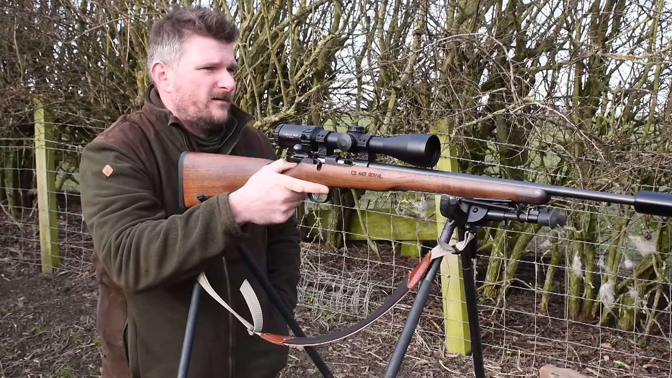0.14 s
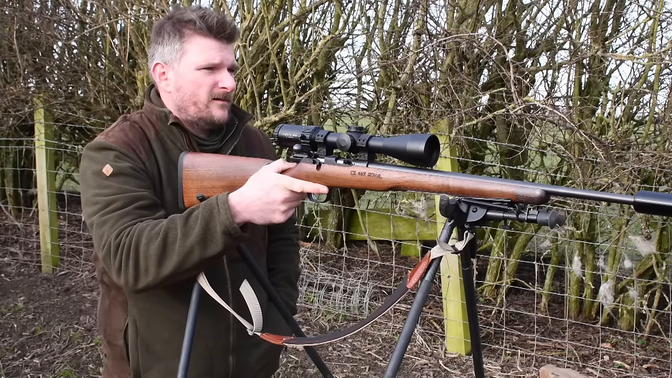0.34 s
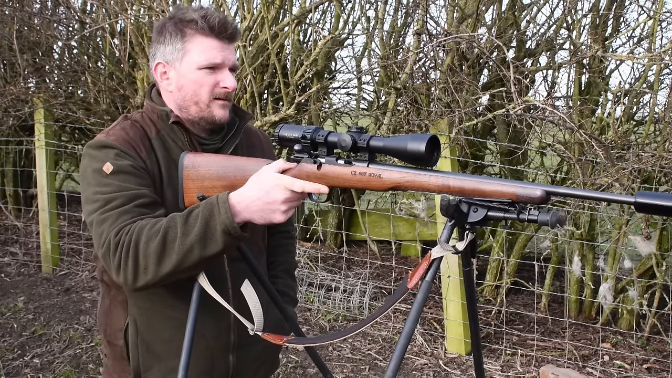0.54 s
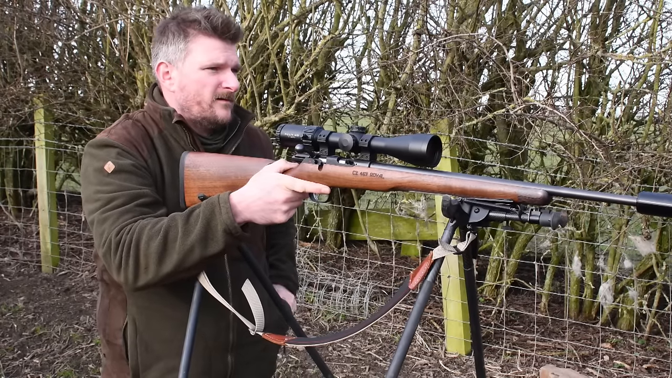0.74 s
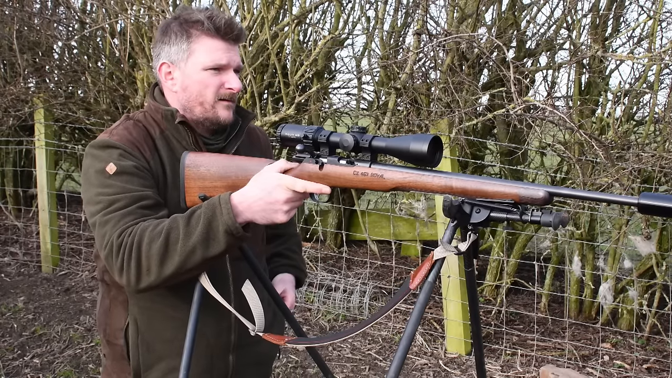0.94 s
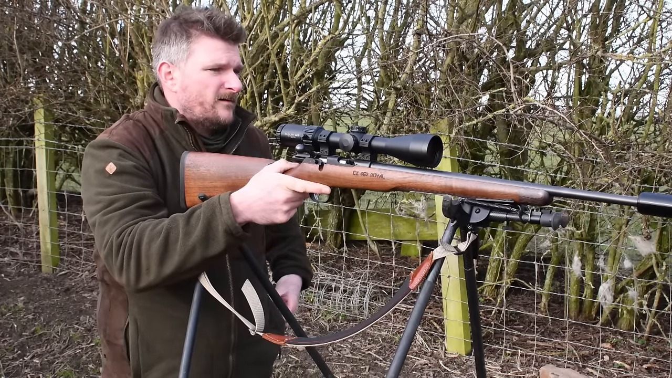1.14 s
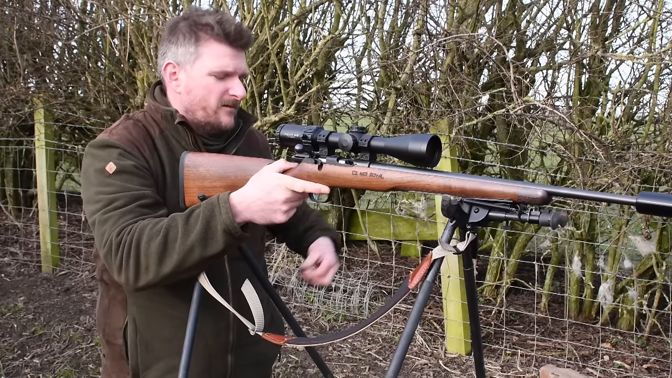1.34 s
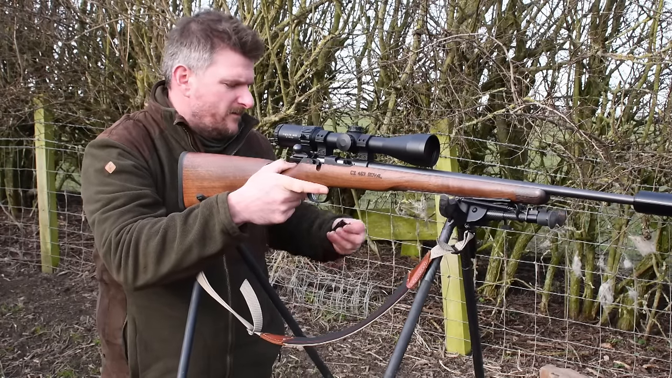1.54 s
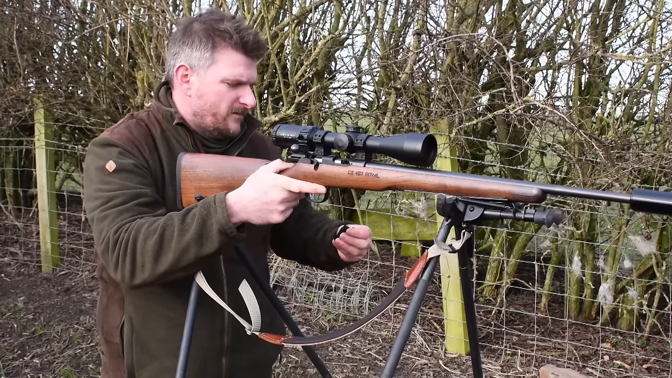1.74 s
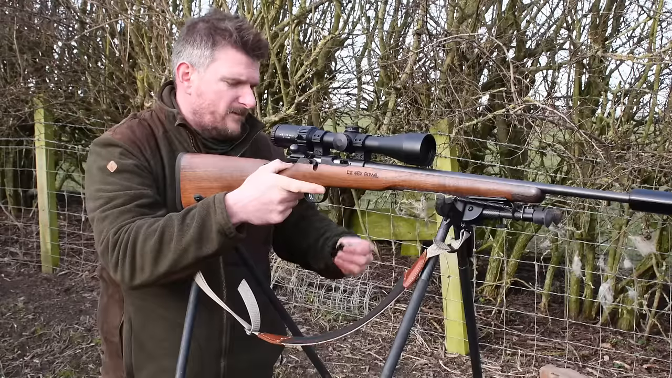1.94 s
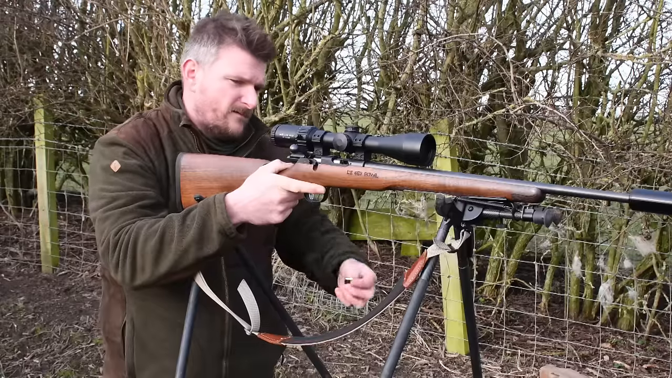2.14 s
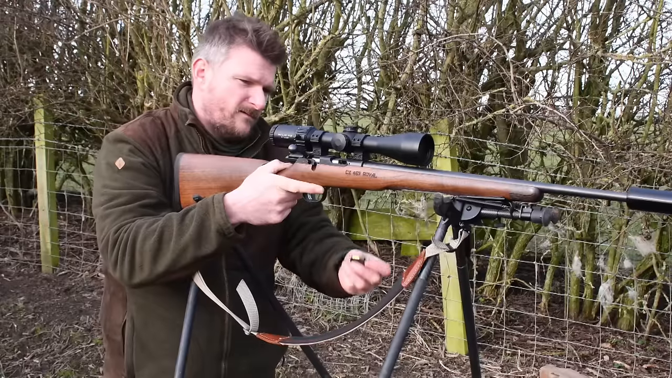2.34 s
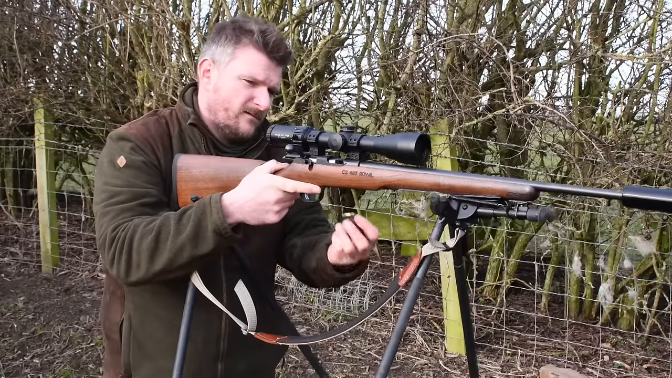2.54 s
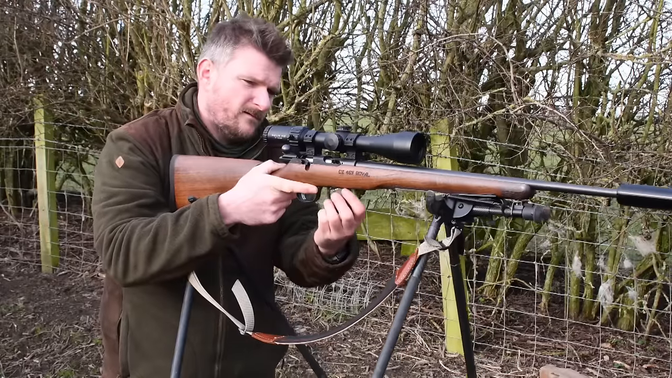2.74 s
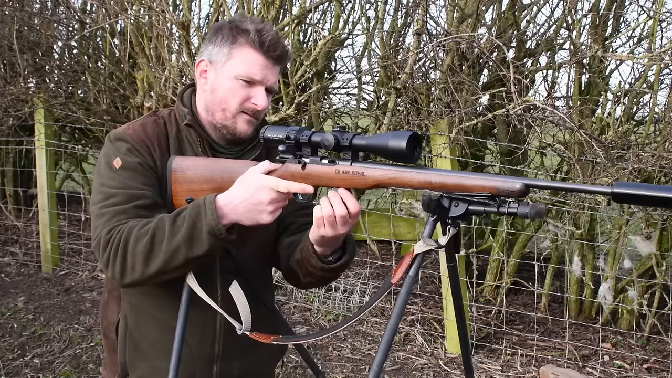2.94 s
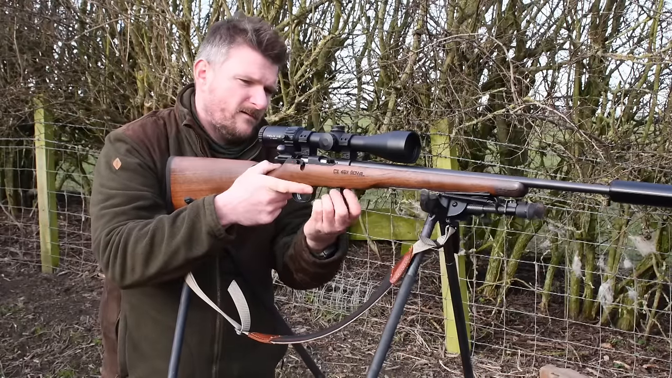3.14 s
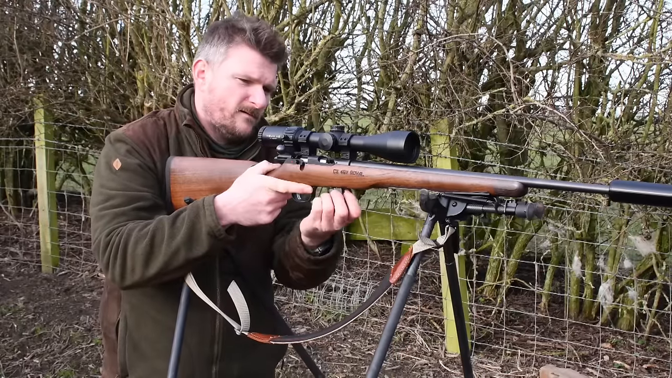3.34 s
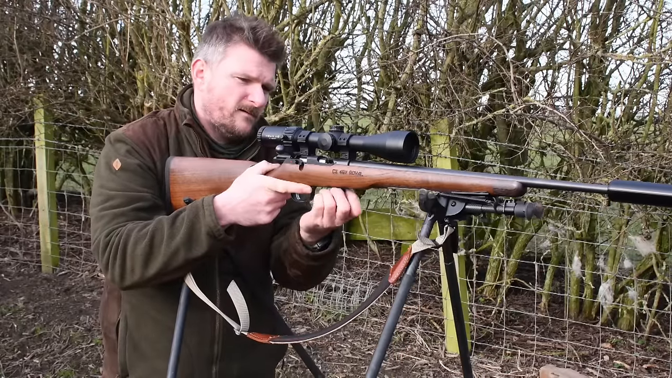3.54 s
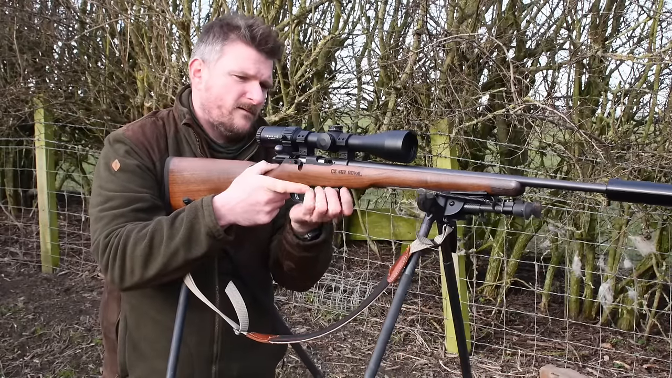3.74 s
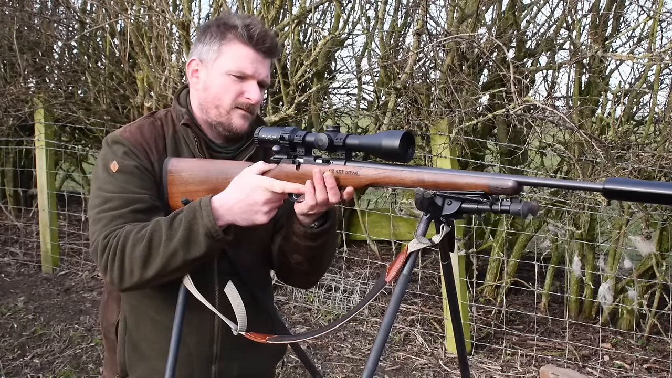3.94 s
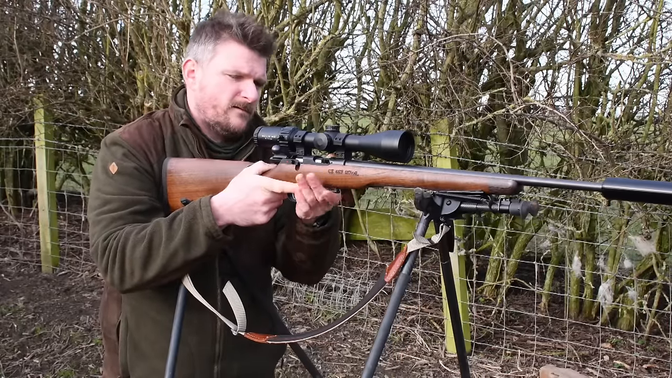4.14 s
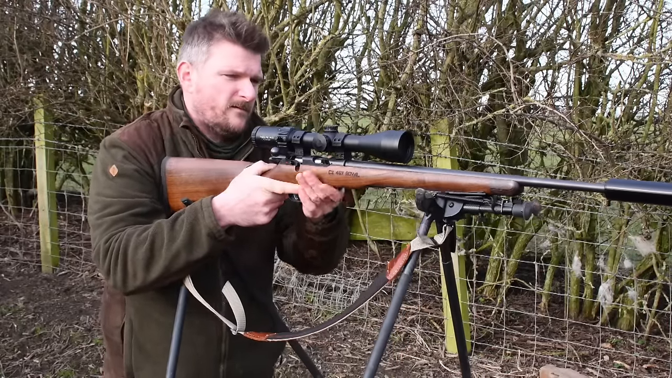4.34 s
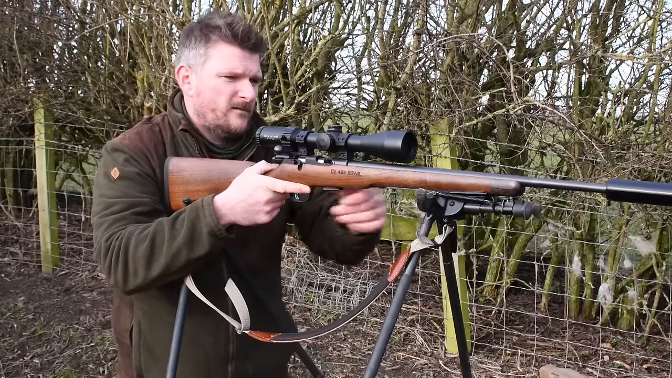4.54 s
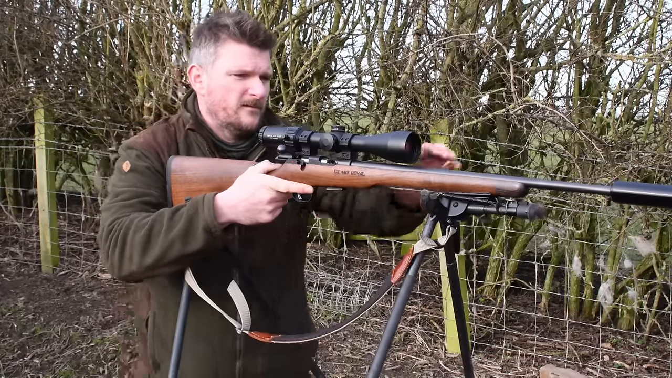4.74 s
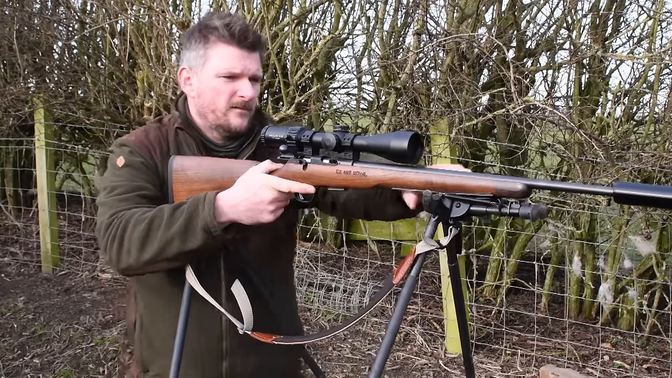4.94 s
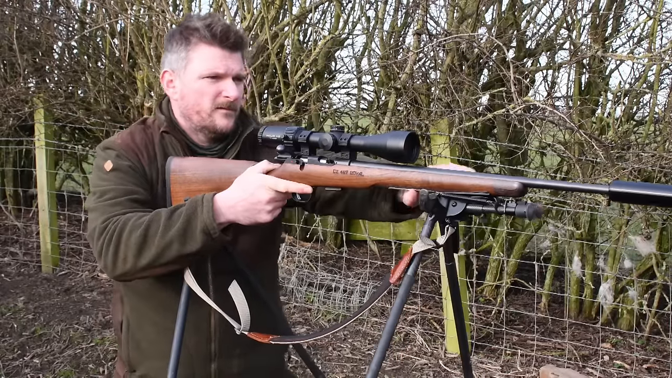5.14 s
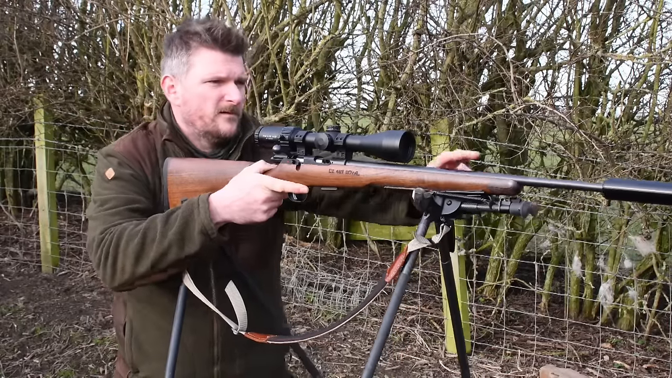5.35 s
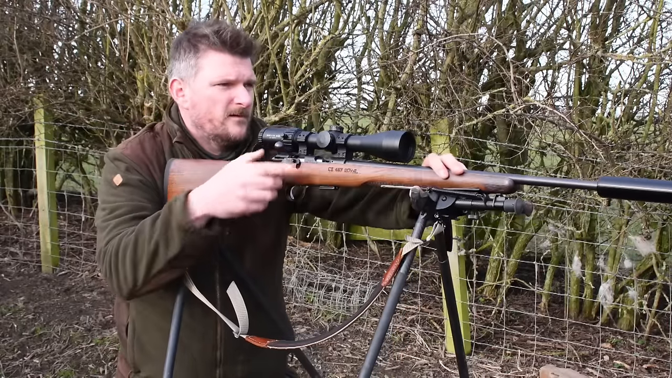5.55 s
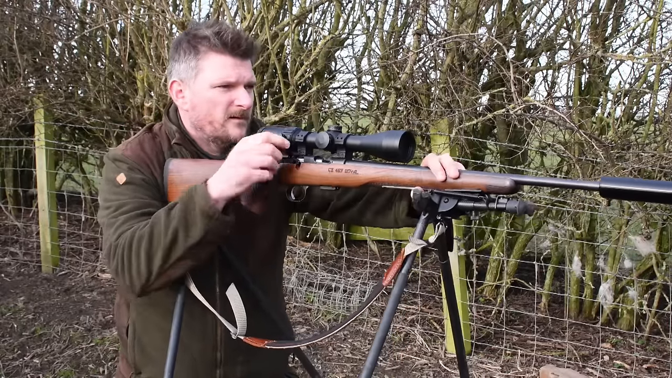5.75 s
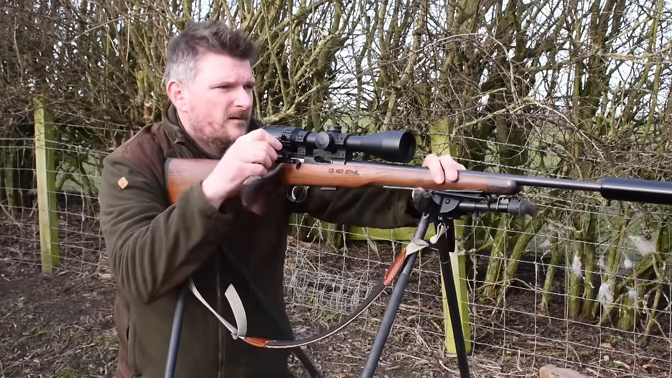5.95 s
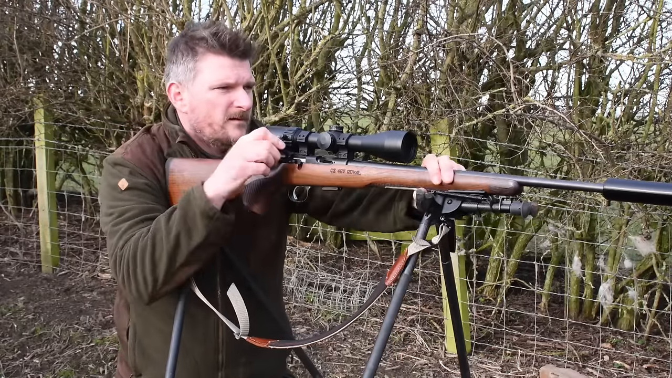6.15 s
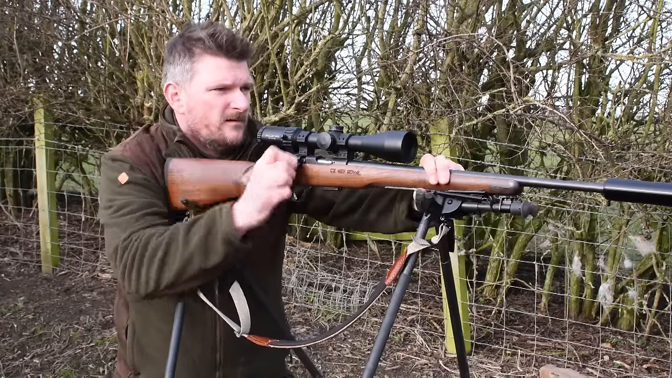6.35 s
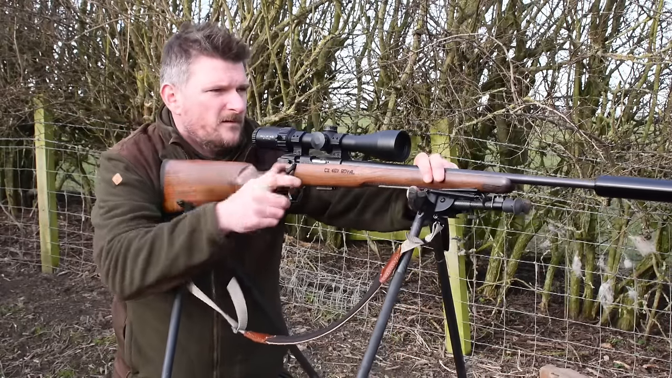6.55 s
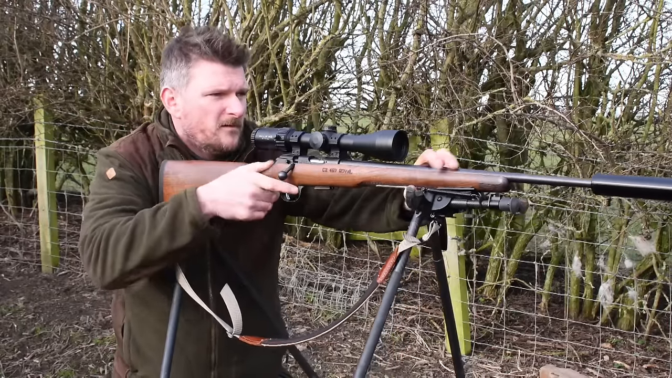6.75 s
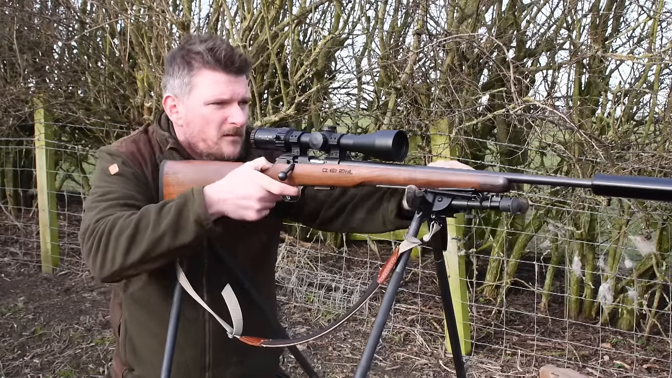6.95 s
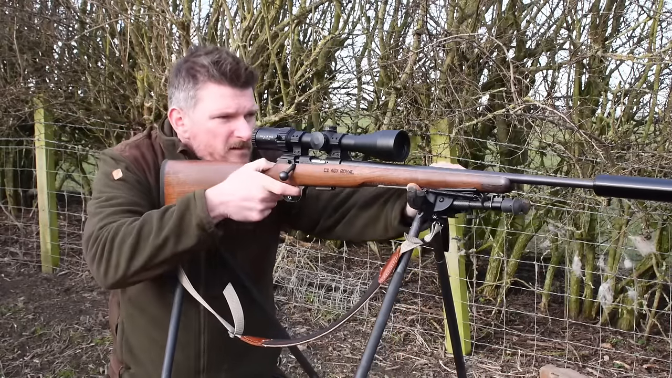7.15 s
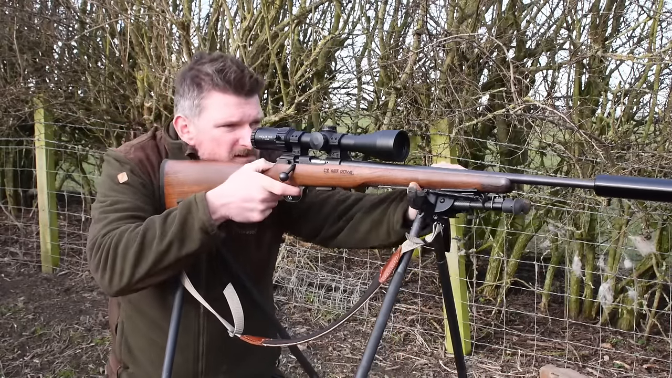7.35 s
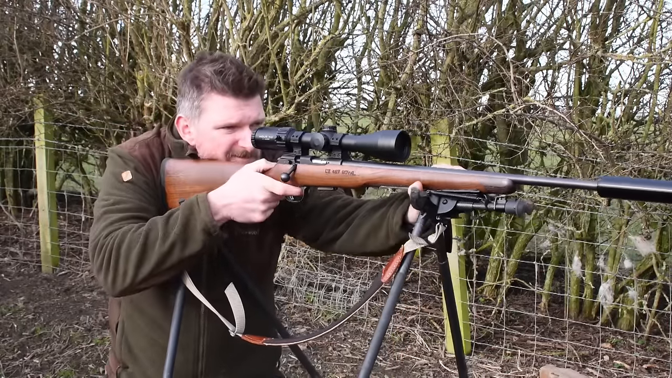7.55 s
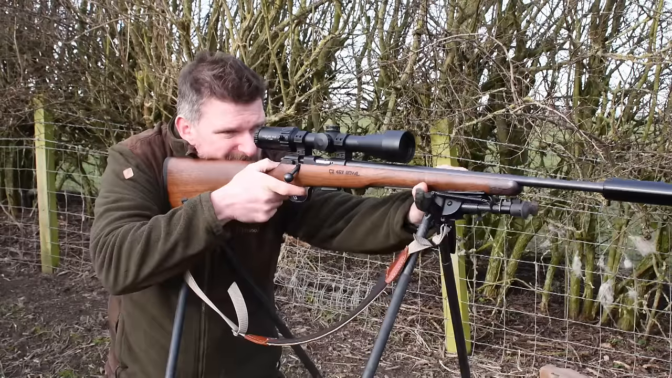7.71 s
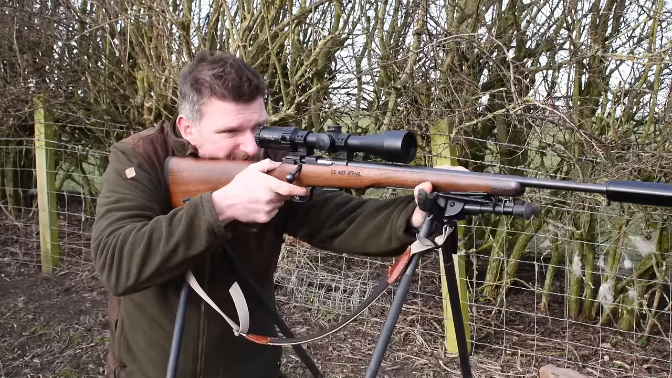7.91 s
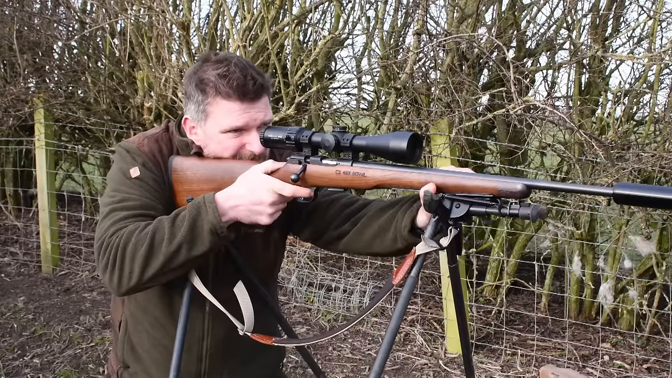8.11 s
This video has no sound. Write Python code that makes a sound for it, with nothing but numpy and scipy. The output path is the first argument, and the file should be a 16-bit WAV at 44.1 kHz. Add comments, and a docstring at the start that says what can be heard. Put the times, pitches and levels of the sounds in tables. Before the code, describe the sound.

Soft cloth rustle and small metal clinks give way to a run of light clicks and scrapes as a magazine is fitted into a rifle and snaps in. The bolt follows, loudest of all, clacking open and shut in quick succession, and a few quiet handling knocks finish. The microphone stands about two metres away in the open air, with faint hiss and far traffic rumble throughout.

```python
"""Outdoors by a hedge, a small-bore rifle on a tripod, two metres from a camera's stereo microphone.
Far road rumble and microphone hiss run throughout. First a hand rummages in a pocket, where loose metal
jingles. From 3 s a magazine scrapes and ticks into its well, then latches; hands and cloth rustle. Near
6 s the bolt is lifted, drawn, pushed home and locked, each blow ringing steel and wood. A last rustle
of hands follows. Ground and hedge scatter every close sound."""
import sys
import numpy as np
from scipy import signal
from scipy.fft import rfft, irfft
from scipy.io import wavfile
from scipy.ndimage import uniform_filter1d

SR = 44100
rng = np.random.default_rng(int(sys.argv[2]) if len(sys.argv) > 2 else 0)


def generate_wav(sig):
    """Save sig (samples, or channels by samples) to the path in sys.argv[1] as 16-bit PCM at SR."""
    pcm = np.round(np.clip(np.atleast_2d(sig).T, -1, 1) * 32767).astype(np.int16)
    wavfile.write(sys.argv[1], SR, pcm)


N = 365148

# Spectra of the far road's rumble and the microphone's hiss: frequency_hz, relative_density_db
RUMBLE_SPECTRUM = [(12, -57), (20, -12), (27, -22), (45, -8.5), (65, 1.5), (97, -1), (167, -2), (260, -7.5),
                   (318, -11.5), (359, -13.5), (572, -14.5), (1010, -25.5), (2500, -31), (3250, -53),
                   (5500, -120)]
HISS_SPECTRUM = [(35, -31.5), (60, -11.5), (189, -3.5), (256, -4), (732, -4), (822, -7), (903, -7.5),
                 (1780, -5), (14600, -9), (16000, -10.5)]
# Slow swell of tyre roar: time_s, gain_db
TYRE_SWELL = [(0.0, -67.5), (0.25, -70.5), (0.62, -65.5), (1.0, -72), (1.38, -67.5), (1.56, -74.5),
              (2.5, -68.5), (4.1, -68.5), (5.46, -65), (6.3, -71.5), (6.7, -67.5), (8.0, -70.5),
              (8.28, -63)]
# Strokes of hand on cloth: full_pressure_s, rise_s, hold_s, fall_s, middle_db, low_db, high_db
HAND_STROKES = [ (0.163, .008, .05, .022, -63.5, -80, -67), (0.256, 0.015, 0.039, 0.027, -53.5, -70, -77),
                (0.305, .01, .035, .01, -62, -79, -76), (0.798, 0.05, 0.0068, 0.072, -58, -49.5, -72),
                (1.39, 0.083, 0.0019, 0.038, -62, -60.5, -81), (4.6, 0.13, 0.1, .14, -67, -76, -69.5),
                (4.81, 0.068, 0.11, .02, -69, -74, -70), (4.926, 0.05, .001, 0.0079, -48.5, -59, -63),
                (4.94, .01, .23, 0.11, -65.5, -72.5, -67.5), (7.58, .06, .003, 0.044, -76, -62, -81),
                (7.912, 0.074, 0.00085, .03, -62, -68, -72), (8.03, 0.14, 0.018, .02, -78, -64.5, -68.5)]
# Middle, low and high bands of hand and cloth rustle: low_hz, high_hz
RUSTLE_BANDS = [(1120, 3340), (490, 1380), (3840, 6900)]
# Shakes of loose metal in the pocket: full_shake_s, rise_s, hold_s, fall_s, level_db
POCKET_SHAKES = [(0.166, 0.015, .045, .015, -67), (0.284, .04, .001, .02, -55.5), (0.3, .01, .04, .01, -76)]
# Blows of hand, magazine and bolt, with each part's peak level: time_s, steel_action_db,
# wooden_stock_db, small_parts_db, spot_pitch_hz, contact_ms
HAND_BLOWS = [ (0.162, -53, -59, -41, 5000, 1.9), (0.2824, -58, -51, -47, 1540, 0.82),
              (0.5254, -51, -48, -70, 1050, 3.7), (0.7533, -49, -37, -68, 780, 3.2),
              (0.7822, -56, -49, -62, 1250, .74), (0.7959, -41, -40, -52, 1810, 1.5),
              (1.212, -59, -57, -66, 1100, 1.2), (1.392, -53, -59, -50, 4070, 1.8),
              (4.5897, -49, -68, -42.5, 8710, 0.75), (4.8126, -62, -59, -47, 7640, 1.1),
              (4.8838, -44, -58, -45, 2140, 1.1), (4.9067, -43, -49, -43, 8220, 1.2),
              (4.9203, -49, -48, -37.5, 2040, 0.84), (5.086, -60, -66, -50, 4800, 1.2),
              (5.212, -62, -64, -49, 7400, 1), (7.6314, -65, -51.5, -66, 719, 0.52),
              (7.906, -40, -48, -56.5, 2130, 0.96)]
MAGAZINE_BLOWS = [ (2.8596, -43.5, -52, -40, 2570, 1.2), (3.034, -44, -39.5, -46, 1340, 0.96),
                  (3.0866, -46.5, -53, -53, 3940, 2.7), (3.2692, -53, -65, -64, 3920, 1.8),
                  (3.4196, -60, -61, -41.5, 5280, 1.1), (3.6249, -45, -52, -43, 5070, 0.67),
                  (3.638, -37, -37, -31.5, 4690, 1.3), (3.6617, -33.5, -35, -46, 1520, 0.54),
                  (3.708, -55, -50.5, -66, 904, .82), (3.8008, -56, -42, -48, 1470, 1.1),
                  (3.821, -48, -65, -41.5, 4460, 1.3), (3.965, -47, -70, -57, 2990, .98),
                  (3.9909, -42, -56, -47, 4340, .99), (4.0654, -46, -55, -56, 1890, 1.4),
                  (4.2354, -45, -52, -47, 8370, 1.6), (4.2428, -35.5, -51, -40.5, 1900, 1.1),
                  (4.3214, -46, -61, -56, 4040, .93), (4.3273, -42, -48, -44, 5540, 1.1),
                  (4.351, -29.5, -42, -27, 4900, 1.06), (4.3682, -18, -39, -13.5, 6500, 1.12)]
BOLT_BLOWS = [ (5.8287, -40.5, -44.5, -59, 1900, 1.06), (5.906, -50, -51, -58, 1990, 1.7),
              (5.9216, -32, -39.5, -40, 2430, 1.4), (5.93, -28.5, -44, -24.5, 4400, 1.44),
              (5.9578, -6, -17, -10.5, 3240, 2.07), (6.2684, -33, -41.5, -51, 3120, 1.5),
              (6.2892, -33.5, -54.5, -34, 2500, 1.4), (6.3046, -33, -44, -23.5, 4500, 1.2),
              (6.321, -22.5, -33.5, -23, 5140, 2.3), (6.3383, -27, -37.5, -25.5, 5060, 1.8),
              (6.3438, -6, -18.5, -6, 3600, 1.9), (6.4375, -41, -34, -48, 1340, 1.9),
              (6.4735, -47, -54, -46, 5040, 1.4), (6.5193, -19, -21, -14.5, 835, 0.9),
              (6.651, -60, -49, -68, 1520, 5.4)]
# Strokes of magazine and bolt: full_pressure_s, rise_s, hold_s, fall_s,
# steel_action_db, wooden_stock_db, small_parts_db
MAGAZINE_STROKES = [ (2.96, 0.082, 0.0092, .06, -87, -69, -84), (3.152, .06, .006, 0.062, -77, -65, -76),
                    (3.27, .06, .02, .03, -83, -78, -81), (3.422, 0.015, .001, 0.014, -56, -54.5, -62),
                    (3.515, .035, 0.013, 0.054, -62, -54.5, -67),
                    (3.642, 0.0047, 0.016, .02, -61, -46, -50.5),
                    (3.776, 0.054, 0.0013, 0.004, -69, -53, -65),
                    (3.8, 0.0026, 0.011, 0.017, -60, -55.5, -66),
                    (3.888, 0.075, .002, 0.022, -51.5, -48.5, -57.5),
                    (3.925, .01, .125, .01, -65, -85, -64),
                    (4.07, 0.016, 0.00085, 0.0073, -50.5, -51.5, -55.5),
                    (4.352, 0.01, 0.0011, .012, -35.5, -43, -42), (4.338, 0.052, .01, .02, -62, -70, -67)]
BOLT_STROKES = [ (5.937, .003, .004, 0.0058, -52, -60.5, -45), (5.951, .006, .003, 0.009, -47, -46, -43),
                (6.272, .003, .002, 0.016, -44, -52.5, -58), (6.308, .006, .032, .004, -36.5, -43, -43.5),
                (6.285, .01, 0.014, 0.0073, -50.5, -56, -55.5),
                (6.322, .006, .002, 0.016, -34.5, -34, -31.5), (6.445, .003, .001, 0.0085, -50, -55, -67),
                (6.471, .025, .002, 0.081, -61, -62, -59.5)]
# Resonances of rifle and magazine: pitch_hz, width_hz, relative_db
RIFLE_MODES = [(303, 90, -16.5), (596.6, 36, -2.5), (8730, 200, -10.5), (11100, 300, -22), (1044, 47, -6.5),
               (2380, 320, -2.5), (710, 120, -5.5), (1283, 49, 0), (1517, 72, -0.5), (1910, 140, 5.5),
               (2682, 57, 6), (3120, 140, 1), (3040, 39, -11.5), (3410, 44, 0.5), (3940, 150, 2),
               (4340, 200, -1), (4984, 120, 2), (5450, 67, 0.5), (5930, 62, -6.5), (6100, 600, -11),
               (7760, 230, -7.5), (8150, 140, 2.5), (8990, 130, -16), (9170, 120, -28), (9400, 54, -17.5),
               (12180, 450, -15.5), (13350, 190, -28), (14300, 250, -15), (14800, 55, -23.5),
               (15120, 160, -33.5)]
MAGAZINE_MODES = [(523, 170, -12), (923, 80, 0.5), (1360, 69, 5), (1950, 160, 6), (3030, 180, 2.5),
                  (4170, 190, 5.5), (4860, 190, 3), (5470, 340, -4), (6500, 410, -8), (7550, 230, -12.5),
                  (8260, 130, -25), (8730, 170, -2.5), (10660, 300, -14), (11100, 180, -20),
                  (12530, 400, 0), (13800, 600, -3), (15200, 150, -28)]
# Limits between which butt, stock, action, small parts and edge radiate, in that order: frequency_hz
PART_LIMITS_HZ = (180, 650, 1700, 4200, 9500, 16500)

# Tone of each kind of blow; ring_scale shortens the ring, usual_hz is for stock, action and small parts
HAND_TONE = dict(ring_scale=.49, usual_hz=(1300, 2210, 5040), butt_db=-9.5, edge_db=-15, edge_slope=.94)
MAGAZINE_TONE = dict(ring_scale=.61, usual_hz=(1340, 1980, 5000), butt_db=-30, edge_db=6, edge_slope=1.73)
BOLT_TONE = dict(ring_scale=.6, usual_hz=(1300, 2300, 4450), butt_db=-16, edge_db=-9.5, edge_slope=1.15)
SIDES = np.array([[1], [-1]])  # left, right


def undb(db):
    """Gain of a level in dB."""
    return 10 ** (np.asarray(db) / 20)


def noise(spectrum, rms_db):
    """Steady noise of a given colour and level."""
    hz, density_db = np.transpose(spectrum)
    log_bins = np.log(np.arange(N // 2 + 1) * SR / N + 1)
    colour = undb(np.interp(log_bins, np.log(hz), density_db))
    x = irfft(rfft(rng.standard_normal(N)) * colour, N)
    return x * undb(rms_db) / x.std()


def far_road():
    """Distant rumble reaches both microphone ports nearly alike; tyre roar swells slowly over it."""
    rumble = noise(RUMBLE_SPECTRUM, rms_db=-62) + .1 * SIDES * noise(RUMBLE_SPECTRUM, rms_db=-62)
    swell = undb(np.interp(np.arange(N) / SR, *np.transpose(TYRE_SWELL)))
    roar = noise([(250, -23.5), (500, -3.5), (800, -1), (1400, -8), (4000, -34)], rms_db=-2)
    return rumble + swell * roar


def microphone_hiss():
    """Each port hisses on its own."""
    return np.array([noise(HISS_SPECTRUM, rms_db=-61) for _ in SIDES])


def pressure(strokes, range_db=20):
    """A gain curve per level column: strokes press, hold and let go, moving range_db per rise or fall."""
    gains = np.zeros((len(strokes[0]) - 4, N))
    for full_s, rise_s, hold_s, fall_s, *levels_db in strokes:
        first = max(int((full_s - 2 * rise_s) * SR), 0)
        last = min(int((full_s + hold_s + 2 * fall_s) * SR), N)
        t = np.arange(first, last) / SR - full_s
        slack = np.maximum(np.maximum(-t / rise_s, (t - hold_s) / fall_s), 0)
        gains[:, first:last] += undb(np.array(levels_db)[:, None] - range_db * slack)
    return gains


def pressed(strokes, layers):
    """The same strokes drive every layer, each at its own level."""
    return sum(gain * layer / layer.std() for gain, layer in zip(pressure(strokes), layers))


def stick_slip(grit_db):
    """Friction: dense tiny contacts of uneven size."""
    white = rng.standard_normal(N)
    sizes = np.repeat(rng.exponential(size=N // 40 + 1), 40)[:N]
    return white * undb(grit_db * sizes)


def hand_rubbing(patch_s=.012, patch_db=3):
    """Skin and cloth rustle in three broad bands, with no ring; the grip comes in patches."""
    span = int(patch_s * SR)
    patches = uniform_filter1d(rng.standard_normal((len(RUSTLE_BANDS), N)), span) * np.sqrt(span)
    contacts = stick_slip(grit_db=.5) * undb(patch_db * patches)
    rustles = [signal.lfilter(*signal.butter(2, band_hz, "bandpass", fs=SR), x)
               for band_hz, x in zip(RUSTLE_BANDS, contacts)]
    return pressed(HAND_STROKES, rustles)


def pocket_jingle(pitch_hz=6500, width_hz=52):
    """Loose metal in the pocket: one thin mode shaken by noise."""
    resonance = signal.iirpeak(pitch_hz, pitch_hz / width_hz, SR)
    return pressed(POCKET_SHAKES, [signal.lfilter(*resonance, rng.standard_normal(N))])


def rings(modes, ring_scale, contact_ms, pitches_hz=(), focus_db_per_octave=(6.5, 9.5, 4.5)):
    """Action, stock, small parts, edge and butt swell during contact, then ring down."""
    hz, width_hz, db = np.transpose(modes)
    part = np.searchsorted(PART_LIMITS_HZ, hz) - 1
    for k, near_hz in enumerate(pitches_hz):  # modes near the struck pitch answer most
        db = db - (part == k + 1) * focus_db_per_octave[k] * np.abs(np.log2(hz / near_hz))
    t = np.arange(SR // 30) / SR
    contact_s = contact_ms / 1000
    # each mode is reached a little earlier or later, and detuned slightly by the grip
    lag, detune, phase = np.hsplit(rng.standard_normal((len(hz), 3)), 3)
    peak_s = contact_s * np.exp(.3 * lag)
    swell = np.minimum(t / peak_s, 1) ** 2
    decay = np.exp(-np.pi * width_hz[:, None] * np.maximum(t - peak_s, 0) / ring_scale)
    tones = np.sin(2 * np.pi * (hz[:, None] * (1 + .01 * detune) * t + phase))
    waves = (undb(db) * width_hz)[:, None] * swell * decay * tones
    # the meeting faces crack: a burst of noise about as long as the contact
    progress = t / contact_s
    crack = undb(-5.5) * rng.standard_normal(len(t)) * progress ** 2 * np.exp(2 - 2 * progress)
    radiated = []
    for k in (2, 1, 3, 4, 0):  # a part radiates little outside its own band
        ring = waves[part == k].sum(axis=0)
        band = signal.butter(2, PART_LIMITS_HZ[k:k + 2], "bandpass", fs=SR)
        radiated.append(signal.lfilter(*band, ring + crack * np.abs(ring).max()))
    return radiated


def clicks(blows, modes, ring_scale, usual_hz, butt_db, edge_db, edge_slope):
    """Each blow sets the parts ringing; the butt's level follows the stock, the edge's the small parts."""
    out = np.zeros(N + SR)
    for time_s, action_db, stock_db, small_db, spot_hz, contact_ms in blows:
        start = int((time_s - .0006) * SR)  # contact starts just before it is heard
        struck = np.searchsorted(PART_LIMITS_HZ, spot_hz) - 2
        pitches_hz = [spot_hz if k == struck else hz for k, hz in enumerate(usual_hz)]
        part_db = action_db, stock_db, small_db, edge_db + edge_slope * small_db, stock_db + butt_db
        for db, ring in zip(part_db, rings(modes, ring_scale, contact_ms, pitches_hz)):
            out[start:start + len(ring)] += undb(db) * ring / np.abs(ring).max()
    return out[:N]


def hand_knocks():
    """Light handling knocks ring the rifle briefly."""
    return clicks(HAND_BLOWS, RIFLE_MODES, **HAND_TONE)


def sliding(strokes, modes, grit_db, ring_scale):
    """Sliding faces stick and slip, keeping action, stock and small parts ringing."""
    contacts = stick_slip(grit_db)
    parts = rings(modes, ring_scale, contact_ms=.05)[:3]
    return pressed(strokes, [signal.oaconvolve(contacts, ring)[:N] for ring in parts])


def magazine():
    """The magazine ticks and scrapes against its well, then latches with its hardest blow."""
    ticks = clicks(MAGAZINE_BLOWS, MAGAZINE_MODES, **MAGAZINE_TONE)
    return ticks + sliding(MAGAZINE_STROKES, MAGAZINE_MODES, grit_db=2.5, ring_scale=.44)


def bolt_clacks():
    """The bolt strikes steel on steel, ringing the whole rifle."""
    return clicks(BOLT_BLOWS, RIFLE_MODES, **BOLT_TONE)


def bolt_scrape():
    """The bolt rubs along the action as it travels."""
    return sliding(BOLT_STROKES, RIFLE_MODES, grit_db=1.2, ring_scale=.27)


def ground_and_hedge(direct, ground_s=.0082, ground_db=-17.5, hedge_t60_s=.13, hedge_db=-17.5):
    """Direct sound, one ground bounce and a short, duller hedge scatter, a little different per port."""
    bounce = undb(ground_db) * np.roll(direct, int(ground_s * SR))
    t = np.arange(SR // 5) / SR
    envelope = undb(-60 * t / hedge_t60_s) * np.minimum(t / .0031, 1)
    shared, apart = rng.standard_normal((2, len(t))) * envelope
    tails = signal.lfilter(*signal.butter(1, 14000, fs=SR), shared + .06 * SIDES * apart)
    tails *= undb(hedge_db) / np.sqrt(np.sum(tails[0] ** 2))
    return direct + bounce + signal.fftconvolve(direct[None], tails, axes=1)[:, :N]


def scene():
    """Hands and rifle close to the microphone, the hedge beside them, the road far off."""
    rifle = bolt_clacks() + hand_knocks() + bolt_scrape()
    close = rifle + magazine() + hand_rubbing() + pocket_jingle()
    bass_cut = signal.butter(3, 170, "highpass", fs=SR, output="sos")  # small things move no air down low
    return ground_and_hedge(signal.sosfilt(bass_cut, close)) + far_road() + microphone_hiss()


def record(dry):
    """The camera cuts the treble steeply above 15.9 kHz."""
    return signal.sosfilt(signal.ellip(10, .2, 75, 15900, fs=SR, output="sos"), dry)


dry = scene()
out = record(dry)
generate_wav(out)
```